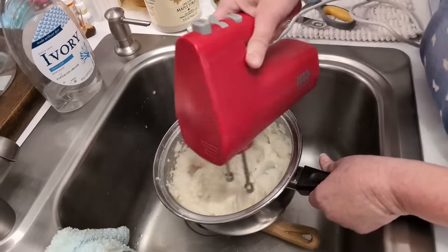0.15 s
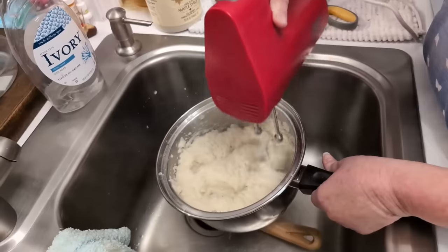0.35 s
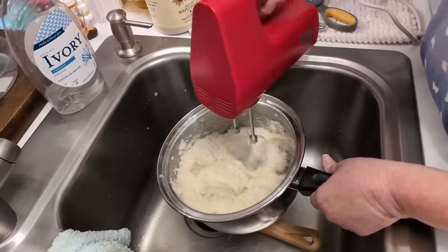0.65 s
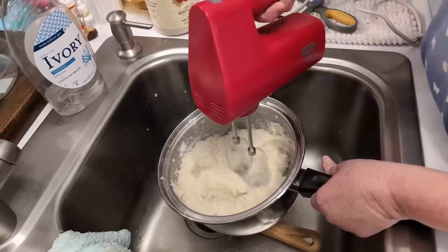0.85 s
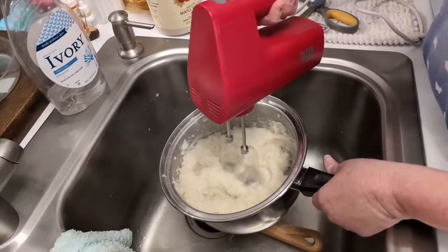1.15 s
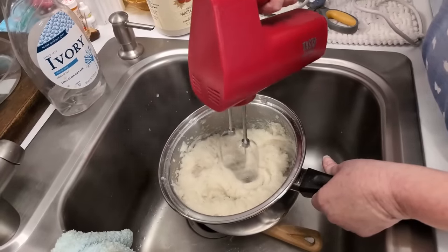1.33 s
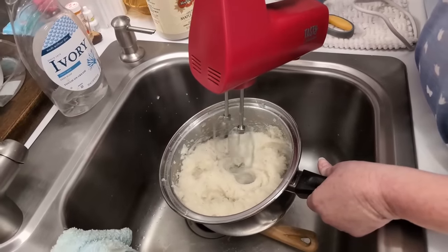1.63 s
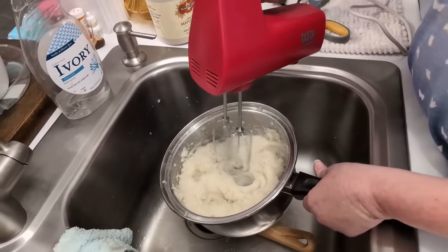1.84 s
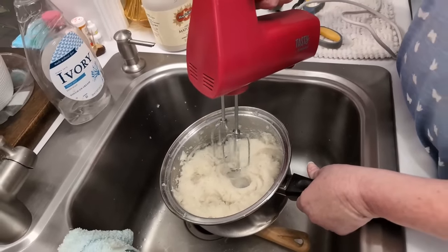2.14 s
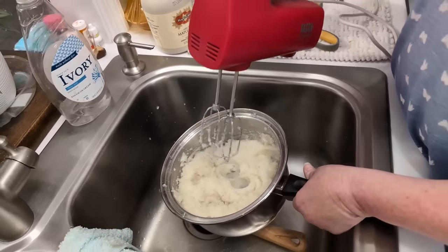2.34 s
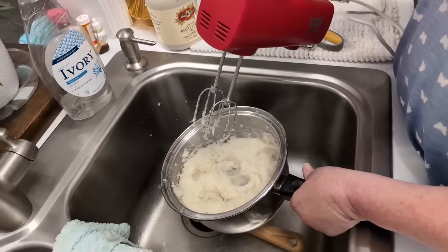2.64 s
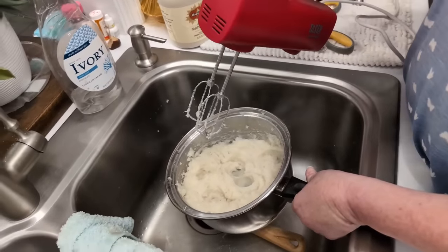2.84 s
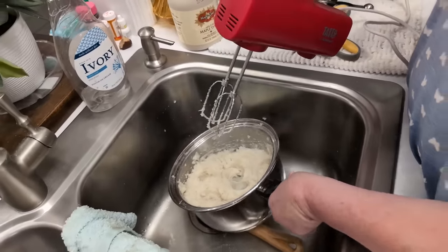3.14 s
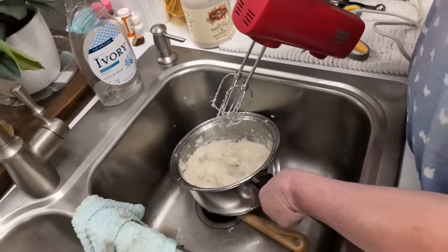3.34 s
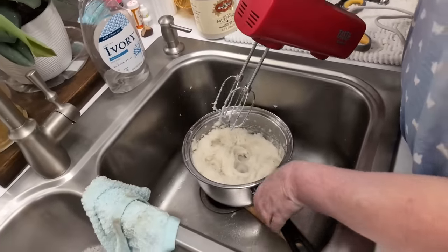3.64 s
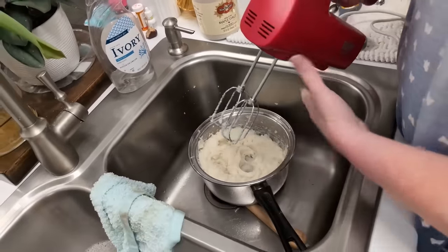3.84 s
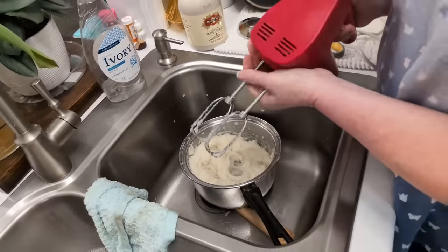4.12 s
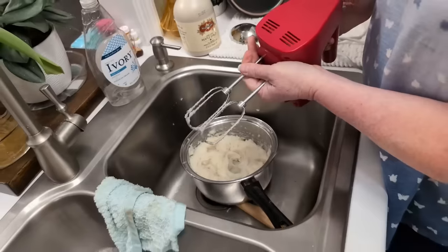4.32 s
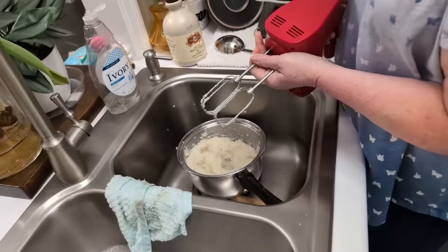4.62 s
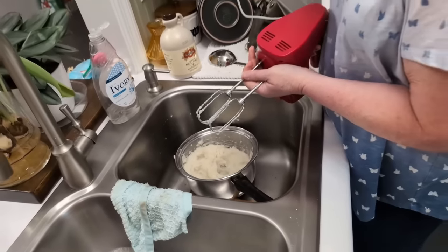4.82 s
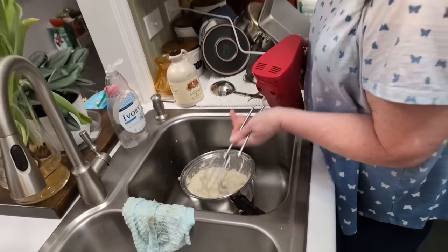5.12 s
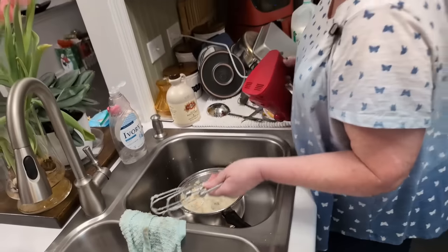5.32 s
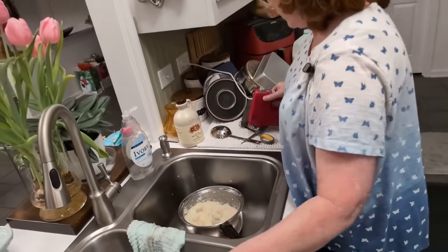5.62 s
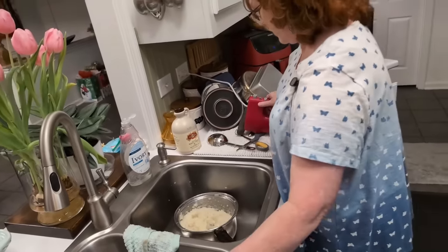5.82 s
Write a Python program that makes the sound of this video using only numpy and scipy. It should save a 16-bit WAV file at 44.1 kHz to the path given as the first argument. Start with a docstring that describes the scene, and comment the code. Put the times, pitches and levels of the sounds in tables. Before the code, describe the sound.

A hand mixer whips potatoes and coasts to a stop, followed by hollow bumps in a metal sink, a sharp snap and light knocks.

```python
"""First comes the whirr of an electric hand mixer whipping potatoes in a steel pot over a kitchen sink.
Its beaters rattle on the pot wall, then it is switched off and its whine slides down to a stop.
The pot bumps down into the booming sink, with one woody knock among the bumps.
The beaters snap out of their sockets and clink together, and the mixer is put on the counter.
Each blow makes the struck object ring at its own pitches."""
import sys
import numpy as np
from scipy import signal
from scipy.io import wavfile

SR = 44100
rng = np.random.default_rng(int(sys.argv[2]) if len(sys.argv) > 2 else 0)


def unload_audio(sound):
    """Save the sound as a 16-bit wav file, at the path given as the first command line argument."""
    columns = np.transpose(np.atleast_2d(sound))
    # keep every value between -1 and 1, then stretch to whole-number steps
    steps = np.round(np.clip(columns, -1, 1) * 32767)
    wavfile.write(sys.argv[1], SR, steps.astype(np.int16))


N = 263277
TIME = np.arange(N) / SR

# The motor's stronger harmonics, as multiples of its turning rate, and their boosts in dB.
STRONG_HARMONICS = (8, 12, 17, 24, 31)
STRONG_BOOST_DB = (12, 3, 3, 5, 6)
# Tones of the gears and the motor's sliding contacts, as multiples of its turning rate, and their dB.
WHINE_MULTIPLES = (3, 5, 7, 12, 24, 31, 36, 41, 48)
WHINE_DB = (-60, -66.5, -70, -68, -62, -75.5, -76, -78, -74)
# How the mixer's case passes the whine and the rush. Each row: pitch in Hz, relative level in dB.
CASE_WHINE = [(200, -30), (480, -14.5), (620, 2.5), (800, 6), (900, -3), (1020, 11), (1250, -11),
              (1600, -6.5), (2000, -5), (2700, -5.5), (3400, -16), (4800, -7.5), (7000, -4), (9000, -0.5),
              (12000, -20.5)]
CASE_RUSH = [(76, -42), (130, -20.5), (220, -11.5), (310, -10.5), (440, -2.5), (630, -1.5), (890, -8),
             (1260, -3), (1780, -10.5), (2510, -7.5), (3550, -9), (5000, -14), (7100, -19.5), (10000, -27),
             (15500, -36.5)]
# The beaters dig into the mash. Each row: time in seconds, relative level in dB.
DIGS = [(0, -58), (.45, -41), (.78, -46), (1.11, -49.5)]
# The kitchen's still air. Each row: pitch in Hz, level in dB per half octave.
STILL_AIR = [(30, -112), (70, -90.5), (130, -89.5), (250, -89.5), (600, -83.5), (1500, -90), (3000, -91),
             (7000, -94.5), (15000, -104)]
# The kitchen's echo. Each row: pitch in Hz, ring time (to fade by 60 dB) in seconds.
ECHO_TIMES = [(100, 0.2), (500, 0.62), (1500, 0.3), (4000, 0.36), (8000, 0.24), (15000, 0.26)]

# Touches. Each row: time in seconds, strength in dB, contact time in ms, favoured pitch in Hz.
WALL_PRESSURE = [(0.2002, -30.5, 0.1, 5620), (0.218, -30, 0.077, 5600), (.283, -50, .05, 6940),
                 (0.319, -29, 0.097, 5640), (.348, -38, 0.11, 5600), (.365, -25.5, 0.11, 7500),
                 (0.397, -24.5, 0.2, 5680), (0.43, -30, 0.18, 3287), (0.457, -28, 0.12, 3560),
                 (.462, -18, 0.18, 3110), (0.484, -31.5, 0.26, 3030)]   # beaters pressed along the pot wall
GRAZES = [(.189, -41, 0.15, 3840), (1.1747, -46, 0.13, 3080), (1.3196, -38.5, .11, 4160),
          (1.3364, -44, 0.1, 4360), (2.792, -71.5, 0.13, 4950), (2.908, -61, 0.27, 1780)]   # stray touches of a beater on the pot
KNOCKS = [(4.765, -34, 0.26, 1368), (4.77, -9, 0.34, 2600), (5.118, -34, 0.47, 1295),
          (5.193, -39.5, 0.41, 627), (5.217, -27, 0.29, 1788), (5.498, -39.5, 0.52, 1490),
          (5.535, -28, 0.49, 1978), (5.619, -45.5, 0.47, 1480), (5.811, -27, 0.89, 1237),
          (5.82, -25, 0.45, 1150), (5.839, -24.5, 0.41, 1640), (5.923, -18.5, 1.33, 583)]   # the beaters' catch, and knocks on the mixer
CLINKS = [(5.3723, -28, 0.35, 10500), (5.411, -63, 0.043, 10300), (5.6854, -38, .5, 14300),
          (5.6989, -53.5, .1, 6440), (5.7184, -64, .05, 10100), (5.738, -40.5, 0.51, 6460)]   # loose beaters touching each other
# Hits in the sink: the pot's bumps and, at 3.61 s, a woody knock, probably a spoon.
# Each row: time in seconds, strength in dB, contact time in ms,
# favoured pitch in Hz, boom of the basin in dB, rocking time in seconds.
SINK_HITS = [(3.282, -51, 0.21, 655, -38, 0), (3.296, -39.5, 0.66, 635, -32.5, 0),
             (3.321, -27.5, 0.17, 564, -37, 0), (3.327, -24.5, 0.21, 765, -28, 0),
             (3.381, -18, 0.26, 759, -31, 0), (3.39, -30.5, 0.11, 760, -31, 0),
             (3.407, -29, 0.18, 988, -20, 0), (3.47, -23, 0.37, 435, -26, .06),
             (3.568, -28, 0.6, 479, -32, 0), (3.59, -38.5, 1.1, 529, -30, 0),
             (3.61, -24, 0.48, 571.6, -44, 0), (3.715, -22.5, 0.95, 524, -27, .06),
             (3.778, -24, .8, 700, -27, 0), (3.794, -13, .3, 652, -8.5, .155),
             (3.804, -28, 0.73, 586, -11.5, 0), (3.894, -48, 0.14, 536, -31.5, 0),
             (4.043, -46, 0.18, 714, -51, 0), (4.189, -57.5, 0.36, 972, -69, 0)]
# The pot drags and hands move. Each row: start and end in seconds, rumble in dB, rustle in dB.
HANDLING = [(3.2, 4.072, -65.5, -70.5), (3.6, 3.72, -68, -61.5), (5.1, 5.967, -91, -75),
            (5.63, 5.674, -98, -67.5)]

# Each object's clear notes. Each row: pitch in Hz, relative level in dB, ring time in seconds.
POT_NOTES = [(277, -5.5, .15), (754.5, -5.5, .14), (1046.5, -2, 0.12), (1133, -2.5, 0.083),
             (2030, -10.5, 0.13), (2789, -12, 0.055), (3290, -13, .13), (4301, -13, 0.13),
             (5750, -8.5, .07), (6315, -10.5, .1), (7281, -6, .08), (7370, -4.5, .08)]
SINK_NOTES = [(73.3, -18.5, 0.13), (125.7, -3, 0.28), (143.4, -4, 0.25), (157.9, -2, 0.35),
              (186.9, -15.5, 0.48), (251, -11.5, .2), (281.1, -13, .3), (537.3, -9.5, .25),
              (578, -11, 0.18), (680, -12, .15), (754, -12, .15), (1131, -16, .2), (1924, -16.5, .15),
              (4500, -23, 0.22)]
MIXER_NOTES = [(430, -13, 0.42), (540.5, -6.5, .2), (788, -7, 0.19), (1055, -6.5, 0.21), (1200, -17, 0.33),
               (1304, -15, 0.44), (1322, -15, 0.43), (1421, -13.5, 0.23), (1920, -14, .2),
               (2580, -16.5, .09), (6051, -12.5, .12)]
BEATER_NOTES = [(1480, -15, 0.21), (6934, -15, 0.11), (9900, 0, 0.11), (13900, -10, .1), (14900, -6, .1)]
# Each object's clatter, a crowd of short-lived notes. Each row: pitch in Hz, relative level in dB.
POT_CLATTER = [(60, -22.5), (160, -24), (280, -2.5), (450, -9), (1100, 3), (1600, -3), (3000, -4.5),
               (7000, 3), (10500, 1.5), (15000, -12.5)]
SINK_CLATTER = [(45, -60), (75, -23), (150, -9), (300, -2), (700, -0.5), (1500, -5), (3000, -3), (6000, -3),
                (10000, -3.5), (15000, -9.5)]
MIXER_CLATTER = [(60, -48), (170, -36.5), (280, -23.5), (500, 3.5), (1000, 2.5), (2000, -4), (4000, 10),
                 (6000, 7), (9000, 13.5), (15000, 7)]
BEATER_CLATTER = [(150, -40), (600, -6), (2000, 5), (5000, -9), (8000, -12), (11000, 14), (15000, -7)]
# How each object answers a perfectly sharp blow. Each row: pitch in Hz, relative level in dB.
POT_ANSWER = [(400, -8), (1730, -3.5), (4900, -1), (11000, 2.5)]
SINK_ANSWER = [(550, -4), (1730, -0.5), (4900, 5.5), (11000, 8.5)]
MIXER_ANSWER = [(550, -19), (1730, -1.5), (4900, -7.5), (11000, -7.5)]
BEATER_ANSWER = [(1730, -14.5), (4900, -5), (11000, 5)]

BLOW_BANDS_HZ, BOOM_HZ = (500, 1730, 4900, 11000), 165   # pitches where a blow's strength is set
FREE_SPEED, LOADED_SPEED = 310.7, 305.5   # motor turns per second: free, and dragging on the pot wall
GEAR_RATIO, FIRM_DB = 5, -27   # motor turns per beater turn; strength that counts as firm pressure
SWITCH_OFF_S, COAST_S, COAST_POWER = 1.18, 1.73, 1.54


def from_db(db):
    """Turn decibels into a number to multiply by."""
    return np.exp(np.asarray(db) * (np.log(10) / 20))


def unit_power(x):
    """Scale a sound to an average power of 1."""
    return x / np.sqrt(np.mean(x ** 2) + 1e-20)


def at_hz(points, hz):
    """Read between a table's rows, with octaves evenly spaced."""
    pitches, values = np.transpose(points)
    return np.interp(np.log(hz), np.log(pitches), values)


def drift(rate):
    """A random wander of about 1 either way, changing rate times a second."""
    return np.interp(TIME * rate, np.arange(4096), rng.standard_normal(4096)) * np.sqrt(3 / 2)


def band_noise(low_hz, high_hz, size=N):
    """Noise between two pitches, with a power of 1."""
    band = signal.butter(3, [low_hz, high_hz], "band", fs=SR, output="sos")
    return unit_power(signal.sosfilt(band, rng.standard_normal(size)))


def noise_bank(size=N):
    """Half-octave bands of noise. Each row: middle pitch in Hz, samples."""
    edges = 33 * 2 ** np.arange(0, 9.1, .5)
    return [(np.sqrt(low * high), band_noise(low, high, size)) for low, high in zip(edges, edges[1:])]


def motor_speed(inertia_s=.074):
    """Turns per second: steady, sagging while the beaters rub the wall, then coasting down."""
    s, db, _, _ = np.transpose(WALL_PRESSURE)
    load = np.interp(TIME, s, np.minimum(from_db(db - FIRM_DB), 1), left=0, right=0)
    lag = np.exp(-1 / (inertia_s * SR))
    drag = signal.lfilter([1 - lag], [1, -lag], np.sqrt(load))
    driven = FREE_SPEED - (FREE_SPEED - LOADED_SPEED) * drag
    coasting = np.clip(1 - (TIME - SWITCH_OFF_S) / COAST_S, 0, 1) ** COAST_POWER
    return np.maximum(driven * coasting, 1)


def motor_hum(speed, turns, level_db=-56.5, fall_db=.92, waver_db=2.5):
    """The motor hums at wavering multiples of its turning rate, which fade quickly as it slows."""
    on = TIME < SWITCH_OFF_S + COAST_S
    hum, boosts = np.zeros(N), dict(zip(STRONG_HARMONICS, STRONG_BOOST_DB))
    for k in range(1, 36):
        db = boosts.get(k, 0) - fall_db * k + waver_db * drift(25)[on]
        hum[on] += from_db(db) * np.sin(2 * np.pi * (k * turns[on] + rng.random()))
    return hum * from_db(level_db) * (speed / FREE_SPEED) ** 6.5


def gear_whine(speed, turns, flutter_db=4.5, loaded_db=-10):
    """Tones of gears and sliding contacts swell in turn as they fall past pitches the case favours."""
    whine, share = np.zeros(N), speed / np.max(speed)
    turns = turns + .005 * (1 - share) * drift(180)   # slack gears judder
    for k, db in zip(WHINE_MULTIPLES, WHINE_DB):
        level_db = db + at_hz(CASE_WHINE, k * speed) + flutter_db * drift(55)
        whine += from_db(level_db) * np.sin(2 * np.pi * (k * turns + rng.random()))
    driven = np.clip((share - .85) / .15, 0, 1)   # teeth held tight under load are quieter
    turning = np.clip((speed - 8) / 42, 0, 1)
    return whine * share ** .48 * from_db(loaded_db * driven) * turning


def rush_db(speed, full_db, loss_db, stall_speed):
    """A rush sinks evenly with the speed and dies below stall_speed, in turns per second."""
    return full_db - loss_db * (1 - speed / FREE_SPEED) - 10 * np.log10(1 + (stall_speed / speed) ** 4)


def motor_rush(speed):
    """The fan blows air and the motor's brushes hiss; both throb with each turn of the beaters."""
    turns = np.cumsum(speed) / SR
    bands = [(hz, from_db(at_hz(CASE_RUSH, hz)) * np.sqrt(hz) * noise) for hz, noise in noise_bank()]
    air = unit_power(sum(noise for hz, noise in bands if hz < 3000))
    hiss = unit_power(sum(noise for hz, noise in bands if hz > 3000))
    air *= from_db(rush_db(speed, full_db=-50.5, loss_db=24, stall_speed=72))
    hiss *= from_db(rush_db(speed, full_db=-59.5, loss_db=17, stall_speed=71) + .65 * drift(430))
    motor_pulse = 1 + .24 * np.cos(2 * np.pi * turns)
    beater_throb = 1 + .083 * np.cos(2 * np.pi * turns / GEAR_RATIO)
    return (air + hiss * motor_pulse) * beater_throb


def mash_churn(speed, dig_s=.047):
    """The mash thuds softly around the beaters, most when they dig in, and settles as they slow."""
    digs = sum(from_db(db) * np.exp(-((TIME - s) / dig_s) ** 2) for s, db in DIGS)
    stirring = from_db(-61.5) * (speed / FREE_SPEED) ** 21
    return from_db(-5.5) * (digs + stirring) * band_noise(62, 112)


def still_air(bank):
    """The kitchen's air makes a faint, steady hush."""
    return sum(from_db(at_hz(STILL_AIR, hz)) * noise for hz, noise in bank)


def kitchen_echo(x, tail_db=-20.5, early_db=-13.5, early_ring_s=.13):
    """Sound bounces quickly off the sink and counter, then dies away in the room."""
    t = TIME[:SR * 2 // 3]
    tail = sum(np.sqrt(hz) * noise * from_db(-60 * t / at_hz(ECHO_TIMES, hz))
               for hz, noise in noise_bank(len(t)))
    tail *= np.clip(t / .006, 0, 1)
    early = rng.standard_normal(len(t)) * from_db(-60 * t / early_ring_s) * (t > .002)
    echo = from_db(tail_db) * unit_power(tail) + from_db(early_db) * unit_power(early)
    return x + signal.fftconvolve(x, echo / np.sqrt(len(t)))[:N]


def blow_levels(db, contact_ms, answer, slope_db):
    """A blow's dB in each band. Longer contact is duller: highs lose slope_db an octave."""
    bands = np.array(BLOW_BANDS_HZ)
    power = slope_db / (10 * np.log10(2))
    return db + at_hz(answer, bands) - 10 * np.log10(1 + (bands * contact_ms / 1000) ** power)


def to_blows(touches, answer, ring_s, slope_db):
    """Make blows. Each row: time in seconds, favoured pitch in Hz, ring time in seconds, dB by band."""
    return [(s, hz, ring_s, blow_levels(db, ms, answer, slope_db)) for s, db, ms, hz in touches]


def ring(clicks, hz, ring_s):
    """Each click starts a pure tone that fades by 60 dB in ring_s."""
    decay, step = from_db(-60 / (ring_s * SR)), 2 * np.pi * hz / SR
    return signal.lfilter([0, np.sin(step)], [1, -2 * decay * np.cos(step), decay ** 2], clicks + 1e-18)


def strike(blows, notes, clatter, bank, clatter_db, notes_db, favoured_db, favoured_life, rise_s,
           bass_linger, bands_hz=BLOW_BANDS_HZ):
    """Each blow sets off a short clatter, one favoured pitch, and the object's clear notes."""
    out, clicks = np.zeros(N), np.zeros((len(notes), N))
    notes_hz = np.array(notes)[:, 0]
    for s, favoured_hz, ring_s, levels_db in blows:
        start = round(s * SR)
        span = slice(start, min(N, start + SR // 6))
        t = TIME[:span.stop - start]
        strength = list(zip(bands_hz, levels_db))
        fall_db = -60 * t / ring_s
        tone_db = at_hz(strength, favoured_hz) + favoured_db + fall_db / favoured_life
        blow = from_db(tone_db) * np.sin(2 * np.pi * favoured_hz * t)
        for hz, noise in bank:
            band_db = at_hz(strength, hz) + at_hz(clatter, hz) + clatter_db
            fade_db = fall_db * (hz / 2000) ** bass_linger   # lows last longest
            blow += from_db(band_db + fade_db) * noise[span]
        out[span] += blow * (1 - np.exp(-t / rise_s))
        clicks[:, start] = from_db(at_hz(strength, notes_hz) + rng.standard_normal(len(notes)))
    for push, (hz, db, ring_s) in zip(clicks, notes):
        out += from_db(db + notes_db) * ring(push, hz, ring_s)
    return out


def pot_rattle(bank):
    """A beater wire hits the pot wall once a turn; under firm pressure the other hits in between."""
    s, *columns = np.transpose(WALL_PRESSURE)
    times = np.arange(s[0], s[-1], GEAR_RATIO / LOADED_SPEED / 2)
    db, ms, hz = (np.interp(times, s, column) for column in columns)
    db[1::2] -= 9 + 5.4 * np.maximum(FIRM_DB - db[1::2], 0)   # the second beater is weaker
    blows = to_blows(list(zip(times, db, ms, hz)) + GRAZES, POT_ANSWER, ring_s=.086, slope_db=22)
    return strike(blows, POT_NOTES, POT_CLATTER, bank, clatter_db=-7.5, notes_db=-4,
                  favoured_db=1.5, favoured_life=.52, rise_s=.0004, bass_linger=.094)


def handling():
    """The pot drags faintly on the sink and hands rub on plastic. Each move swells, holds and fades."""
    rumble = rustle = 0
    for start, end, rumble_db, rustle_db in HANDLING:
        early_s = np.maximum(start - TIME, 0)
        fallen_db = 47 * np.maximum(TIME - end, 0)
        rumble = np.maximum(rumble, from_db(rumble_db - 162 * early_s - fallen_db))
        rustle = np.maximum(rustle, from_db(rustle_db - 88 * early_s - fallen_db))
    rubbing = unit_power(band_noise(390, 3200) + .15 * band_noise(3800, 6500))
    grain = from_db(2.5 * drift(70) + 1.5)
    return rumble * band_noise(140, 170) + rustle * rubbing * grain


def sink_hits(bank, rock_s=.026, rock_hz=538.4, slope_db=16.5):
    """The pot's bumps and one woody knock ring the basin; after some bumps the pot rocks, ever weaker."""
    blows = []
    rock_levels = blow_levels(db=-27.5, contact_ms=1.1, answer=SINK_ANSWER, slope_db=slope_db)
    for s, db, ms, hz, boom_db, rocking_s in SINK_HITS:
        blows.append((s, hz, .1, np.r_[boom_db, blow_levels(db, ms, SINK_ANSWER, slope_db)]))
        for late_s in np.arange(rock_s, rocking_s, rock_s):
            when = s + late_s + rock_s * rng.uniform(-.22, .2)
            levels_db = np.r_[-21.5, rock_levels] - 42.5 * late_s   # the boom's band comes first
            blows.append((when, rock_hz, .11, levels_db))
    return strike(blows, SINK_NOTES, SINK_CLATTER, bank, clatter_db=-7.5, notes_db=-4,
                  favoured_db=-1.5, favoured_life=1.53, rise_s=.0017, bass_linger=.053,
                  bands_hz=(BOOM_HZ, *BLOW_BANDS_HZ))


def mixer_knocks(bank):
    """The mixer's case rings as the beaters snap out and as it is put on the counter."""
    blows = to_blows(KNOCKS, MIXER_ANSWER, ring_s=.076, slope_db=18.5)
    return strike(blows, MIXER_NOTES, MIXER_CLATTER, bank, clatter_db=-6.5, notes_db=-10.5,
                  favoured_db=4, favoured_life=.62, rise_s=.0017, bass_linger=.035)


def beater_clinks(bank):
    """The loose beaters touch, and their wires ring high and briefly."""
    blows = to_blows(CLINKS, BEATER_ANSWER, ring_s=.068, slope_db=17)
    return strike(blows, BEATER_NOTES, BEATER_CLATTER, bank, clatter_db=-8, notes_db=-4.5,
                  favoured_db=2.5, favoured_life=.86, rise_s=.0011, bass_linger=.047)


def scene():
    """Motor, blows and handling in the kitchen; the motor's tones get no echo."""
    speed = motor_speed()
    turns = np.cumsum(speed * (1 + .0007 * drift(40))) / SR   # the pitch wavers slightly
    tones = motor_hum(speed, turns) + gear_whine(speed, turns)
    mixing = motor_rush(speed) + mash_churn(speed)
    bank = noise_bank()
    kitchenware = pot_rattle(bank) + handling() + sink_hits(bank)
    kitchenware += mixer_knocks(bank) + beater_clinks(bank)
    return (tones + still_air(bank) + kitchen_echo(mixing + kitchenware))[None]


def record(dry):
    """The microphone drops the deepest bass, and the highest treble is cut."""
    bass_cut = signal.butter(6, 58, "high", fs=SR, output="sos")
    treble_cut = signal.ellip(12, .1, 80, 15800, fs=SR, output="sos")
    return signal.sosfilt(treble_cut, signal.sosfilt(bass_cut, dry))


dry = scene()
out = record(dry)
unload_audio(out)
```